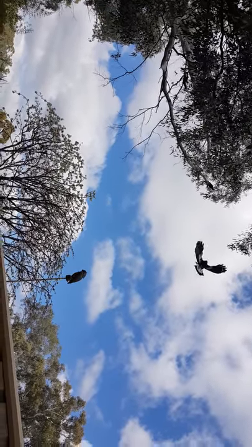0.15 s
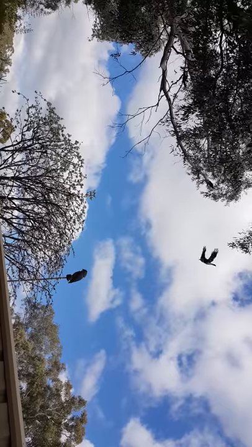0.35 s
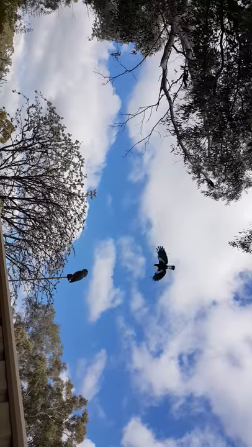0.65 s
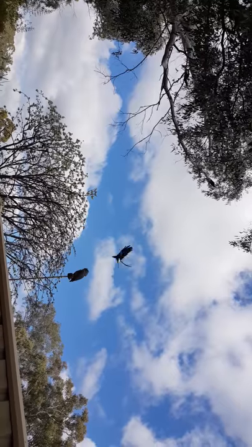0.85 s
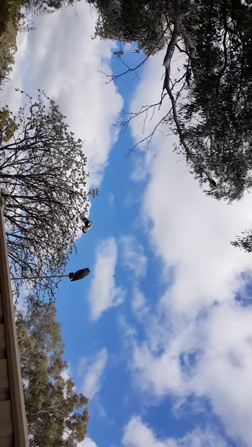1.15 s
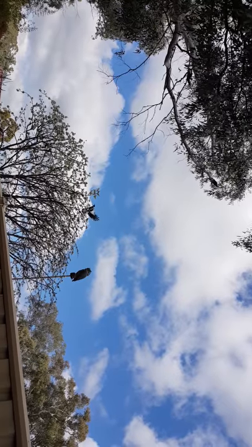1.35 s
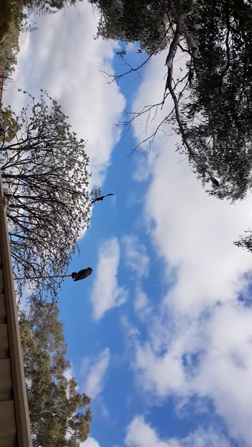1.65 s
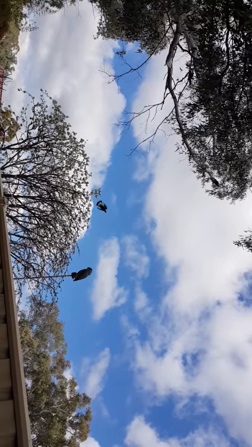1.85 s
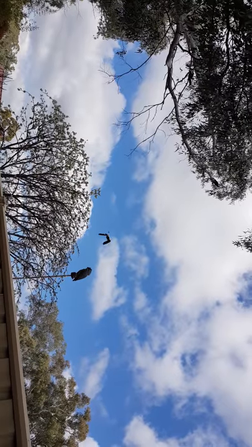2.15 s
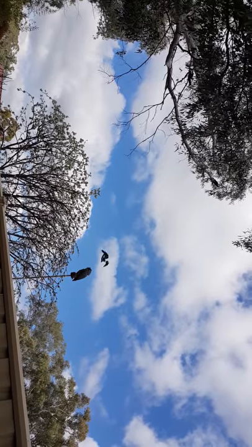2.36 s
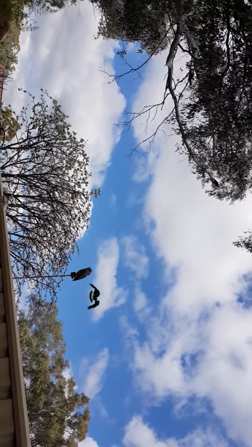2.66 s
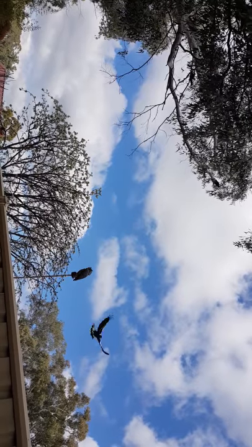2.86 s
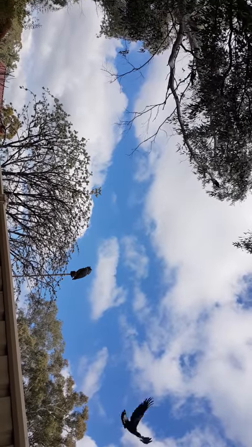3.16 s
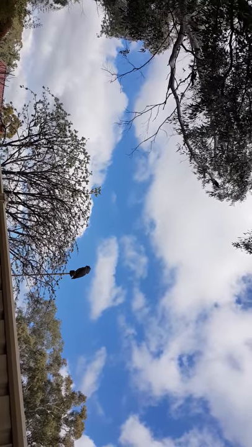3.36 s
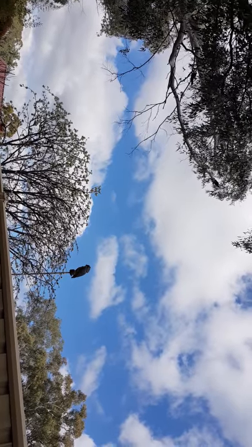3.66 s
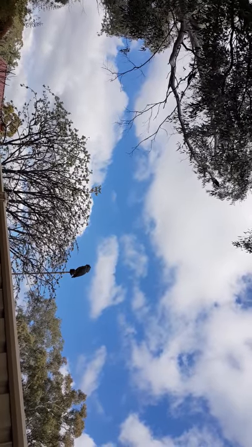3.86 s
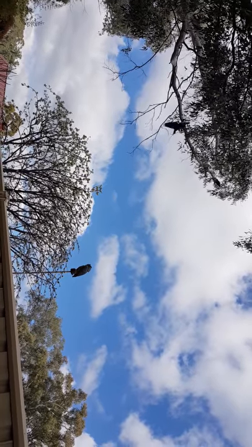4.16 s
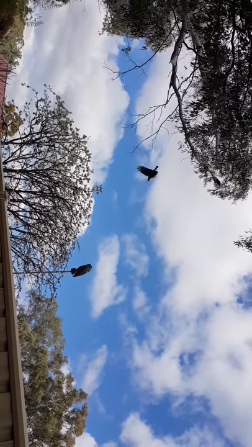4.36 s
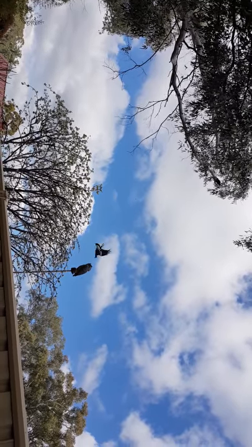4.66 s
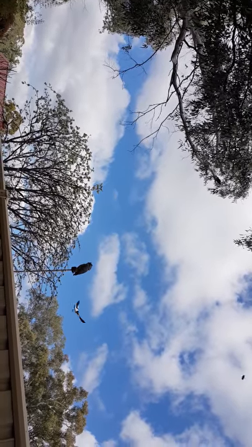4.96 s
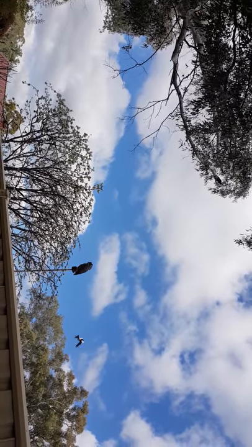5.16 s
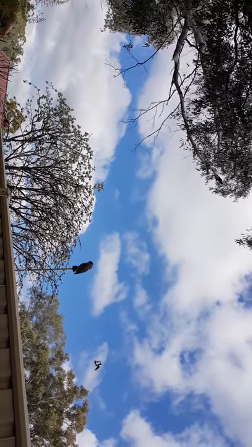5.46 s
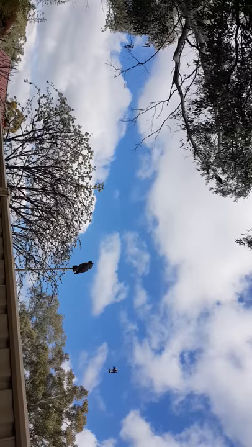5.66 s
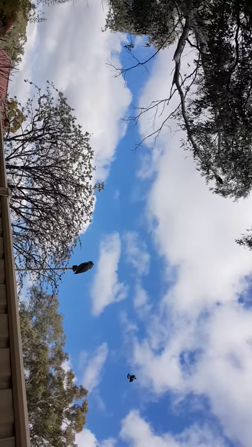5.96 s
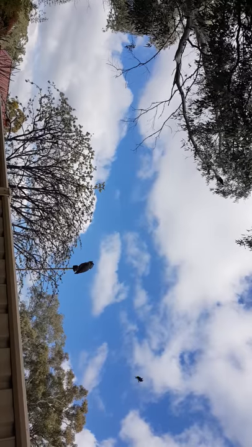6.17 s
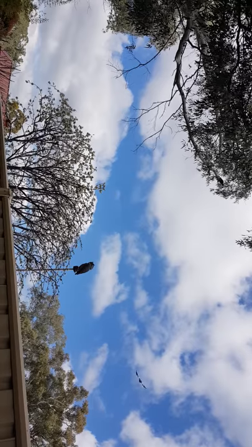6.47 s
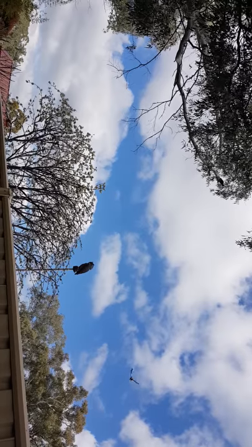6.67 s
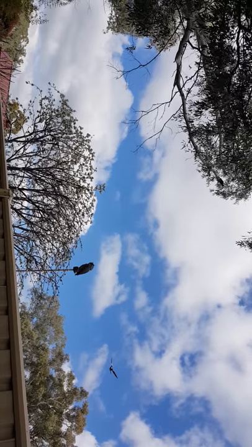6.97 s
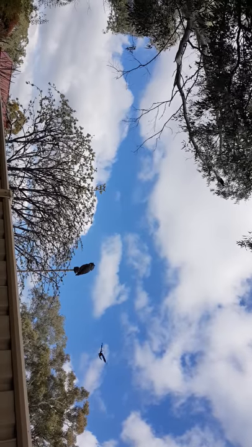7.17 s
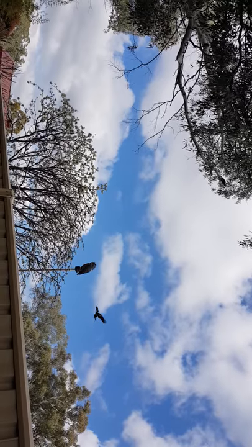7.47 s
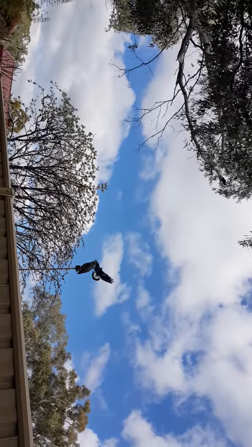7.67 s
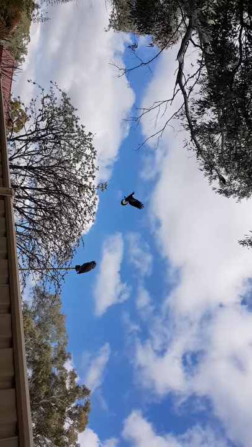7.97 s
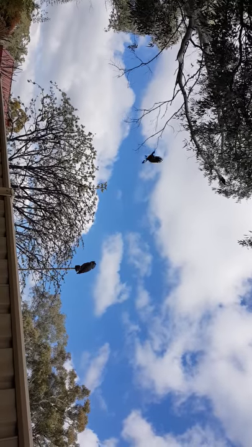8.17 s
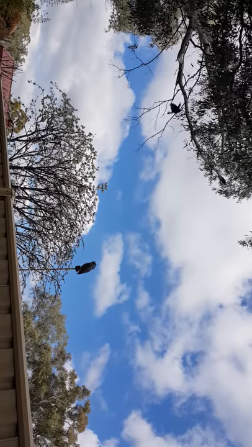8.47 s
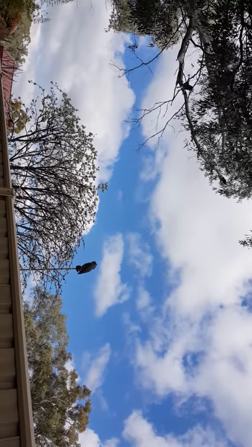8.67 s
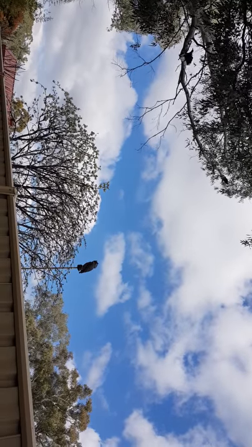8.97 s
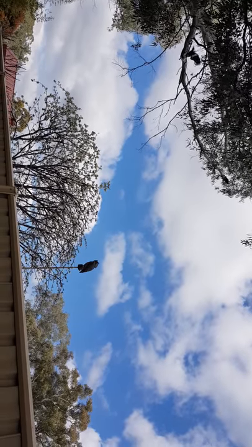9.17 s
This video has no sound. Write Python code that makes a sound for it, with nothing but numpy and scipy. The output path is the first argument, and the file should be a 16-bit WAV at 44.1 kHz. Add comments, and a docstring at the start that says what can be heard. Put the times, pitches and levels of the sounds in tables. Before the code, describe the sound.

Raspy, rattling magpie alarm squawks come in quick succession outdoors, with two loud bill clicks, soft wing puffs, a small bird's dry chips and faint wind.

```python
"""A back yard: magpies scold in runs of short, harsh alarm calls, sometimes two at once.
Each call is a tone, mostly near 1 kHz, shaken by a fast flutter of the voice box (syrinx) and coloured
by the throat; a few whistles hardly flutter. Bills snap and ring, wings push puffs of air, and a small
bird rattles dry chips far off. Walls and trees answer the magpies; behind them lie shaped noises:
wind and gusts on the microphone, the neighbourhood hush and distant traffic."""
import sys
import numpy as np
from scipy import signal
from scipy.fft import rfft, irfft, next_fast_len
from scipy.io import wavfile

SR = 44100
rng = np.random.default_rng(int(sys.argv[2]) if len(sys.argv) > 2 else 0)


def transcribe(u):
    """Save the signal u as a 16-bit wav file named by the first command-line argument.

    u: samples, shape (n,) or (channels, n), limited to [-1, 1]; the rate is SR.
    q: integer samples, one column per channel.
    """
    v = np.clip(np.atleast_2d(u).T, -1, 1)
    q = np.round(v * 32767).astype(np.int16)
    wavfile.write(sys.argv[1], SR, q)


N = 410995
T = np.arange(N) / SR   # time of every sample, s
CUTOFF_HZ = 15750   # top of the voices' harmonics and of the recorded sound


def from_db(db):
    """Turn decibels into gain."""
    return 10 ** (np.asarray(db) / 20)


def rms_one(x):
    """Scale a sound to an average strength (rms) of 1."""
    return x / np.sqrt(np.mean(x ** 2) + 1e-20)


def in_time(rows, t=T):
    """Read each column of a table as a curve at the times t."""
    s, *columns = np.transpose(rows)
    return [np.interp(t, s, column) for column in columns]


def at_hz(points, hz, axis=1):
    """Read one column of a spectrum, with pitch on a log scale as we hear it."""
    points = np.array(points)
    return np.interp(np.log(hz), np.log(points[:, 0]), points[:, axis])


def wander(rate_hz, size):
    """Smooth random drift of rms 1, weaker in its movements faster than rate_hz."""
    hz = np.arange(size // 2 + 1) * SR / size
    gain = (hz > 0) / (1 + (hz / rate_hz) ** 2)
    return rms_one(irfft(rfft(rng.standard_normal(size)) * gain, size))


def flicker(rate_hz):
    """Random drift over the whole scene, worked out at 8192 points and joined by lines."""
    points = wander(rate_hz * N / 8192, size=8192)
    return np.interp(T, np.linspace(0, T[-1], 8192), points)


def coloured(spectrum, alike):
    """Stereo noise of rms 1 with a given spectrum; alike = 1 makes both sides the same."""
    size = next_fast_len(N)
    hz = np.arange(1, size // 2 + 2) * SR / size
    fade_above = 1 / (1 + (hz / (2 * spectrum[-1][0])) ** 4)
    gain = from_db(at_hz(spectrum, hz)) * fade_above
    mid, side = irfft(rfft(rng.standard_normal((2, size))) * gain, size)[:, :N]
    alike = np.clip(alike, -1, 1)
    return rms_one(np.sqrt(1 + alike) * mid + np.sqrt(1 - alike) * side * [[1], [-1]])


def delayed(x, s):
    """Play the sound s seconds later."""
    steps = np.arange(len(x))
    return np.interp(steps - s * SR, steps, x, left=0, right=0)


def add(out, start_s, call, lag_ms=0, pan_db=0):
    """Mix in one sound; a left-side lag and a left-minus-right level place it in stereo."""
    for channel, lag_s, side_db in ((0, lag_ms / 1000, pan_db / 2), (1, 0, -pan_db / 2)):
        at = round((start_s + lag_s) * SR) + np.arange(len(call))
        inside = (at >= 0) & (at < N)
        out[channel, at[inside]] += from_db(side_db) * call[inside]


# Alarm calls, levels relative: start_s, length_s, attack_s, level_db, pitch_hz (middle),
# glide_semitones, arch_semitones, swing (flutter as a share of pitch),
# fundamental_db, edge_db (upper harmonics), bill_db (resonance), top_db (top treble),
# lag_ms (left side later), pan_db (left minus right)
SQUAWKS = [(-0.11, 0.198, 0.05, -19.8, 1105.0, -0.3, 1.1, 0.065, -1.0, -5.3, 10.0, -1.0, 0.05, 0.5),
           (0.284, 0.085, 0.035, -30, 1480, -3, 0.3, 0.1, -2, -9, 0, -5, 0.05, 0),
           (0.315, 0.132, 0.045, -22, 1200, -3.6, 0.3, 0.085, 0, -3.5, 10, -4, 0.05, 0),
           (0.712, 0.279, 0.15, -28.2, 990.0, -2.6, 0.6, 0.103, -0.0, -4.7, -4.0, -1.0, -0.06, 0.5),
           (0.826, 0.242, 0.135, -22.9, 1027.0, 2.6, 1.6, 0.055, -4.0, -7.1, 5.0, -12, 0.06, -0.5),
           (1.223, 0.211, 0.09, -24.4, 1092.0, 0.6, 1.3, 0.047, -1.0, -6.9, 12.0, -8.0, 0.03, 0.5),
           (1.239, 0.199, 0.048, -32.0, 1219.0, -3.6, 0.9, 0.114, 3.0, -2.5, 10.0, -1.0, 0.03, 1.0),
           (1.583, 0.159, 0.044, -31.9, 1664.0, -3.2, 0.6, 0.08, -5.0, -6.5, 2.0, 3.0, -0.03, -0.5),
           (1.636, 0.154, 0.084, -29.6, 1295.0, -2.1, 1.3, 0.067, 6.0, -3.3, -0.0, 2.0, 0.0, 0.0),
           (1.992, 0.192, 0.05, -22.0, 1073.0, -0.1, 1.7, 0.054, -0.0, -8.5, 2.0, 3.0, 0.06, 0.5),
           (2.75, 0.182, 0.042, -17.0, 1073.0, 0.5, 1.4, 0.056, -5.0, -7.9, 7.0, 7.0, 0.14, -1.0),
           (3.077, 0.299, 0.176, -26.8, 968.0, -1.9, -0.2, 0.104, -2.0, -5.9, 1.0, -11.0, -0.05, 1.0),
           (3.157, 0.191, 0.085, -17.2, 1120.0, -0.2, 1.0, 0.057, 0.0, -7.5, 6.0, 8.0, 0.27, -3.5),
           (3.507, 0.257, 0.126, -24.9, 983.0, -0.6, 0.1, 0.062, -3.0, -3.2, 8.0, -2.0, -0.17, 0.5),
           (4.336, 0.152, 0.049, -23.7, 1044.0, -1.3, 0.5, 0.058, -1.0, -11.5, 5.0, -4.0, 0.22, 0.0),
           (4.616, 0.235, 0.091, -23.5, 970.0, -0.2, 0.8, 0.059, -4.0, -8.3, 6.0, -12.0, 0.06, 0.5),
           (5.003, 0.261, 0.152, -22.7, 1026.0, 0.2, 1.4, 0.06, 1.0, -9.1, 2.0, -8.0, 0.08, 0.0),
           (5.296, 0.306, 0.114, -29.6, 954.0, -2.8, 1.0, 0.089, 0.0, -3.2, 3.0, 4.0, -0.07, 1.0),
           (5.513, 0.212, 0.022, -30.6, 970.0, -1.3, -0.2, 0.042, -4.0, -9.9, 10.0, -16.0, 0.19, 0.0),
           (5.933, 0.279, 0.109, -30.0, 1008.0, -1.3, 0.1, 0.03, -0.0, -11, -4, 3.0, 0.22, -2.5),
           (6.45, 0.26, 0.06, -25.7, 992.0, 0.8, 2.0, 0.055, -2.0, -8.5, -2.0, -1.0, 0.08, -2.5),
           (6.825, 0.31, 0.104, -31.6, 957.0, -3.7, 1.1, 0.086, -1.0, -3.3, 1.0, 1.0, -0.07, 1.5),
           (7.825, 0.233, 0.091, -26.9, 947.0, -0.3, 1.0, 0.065, -1.0, -2.3, 5.0, -1.0, -0.03, 1.0),
           (8.022, 0.271, 0.1, -26.3, 935.0, -3.1, 0.1, 0.116, -1.0, -1.8, -2.0, 2.0, -0.1, 2.5),
           (8.075, 0.256, 0.09, -25.8, 999.0, 0.1, 1.9, 0.042, -4.0, -12.1, 1.0, -3.0, 0.07, -4.0),
           (8.306, 0.232, 0.095, -27.0, 918.0, -0.9, 1.0, 0.062, -3.0, -1.2, 8.0, -4.0, -0.15, 1.0),
           (8.545, 0.205, 0.079, -32.7, 809.0, -1.1, 0.5, 0.08, -4.0, 1.1, -8.0, -7.0, -0.22, 3.0)]
ONSET_DB, RELEASE_DB, RELEASE_S = 19, 27, .044   # effort rises from this far down and drops at the end
SWELL_DB = 3   # growth along a call
SAG_SEMITONES_PER_DB = .025   # pitch sags as effort falls
RASP_PER_SWING = .2   # the wider the flutter, the rougher the tone


def alarm_calls(gain_db=-.3):
    """Each call swells, holds and drops; its pitch glides, arches and sags with the effort."""
    out = np.zeros((2, N))
    age = T[:16384]
    for (start, length, attack, level_db, pitch, glide, arch, swing,
         fundamental_db, edge_db, bill_db, top_db, lag_ms, pan_db) in SQUAWKS:
        onset_db = -ONSET_DB * np.clip(1 - age / attack, 0, 1) ** 2
        release_db = -RELEASE_DB * np.clip(1 + (age - length) / RELEASE_S, 0, 2) ** 2
        effort_db = onset_db + release_db
        along = np.minimum(age / length, 1) - .5   # -0.5 at the start, 0.5 at the end
        sag = SAG_SEMITONES_PER_DB * np.maximum(effort_db, -RELEASE_DB)
        semitones = glide * along - arch * (2 * along) ** 2 + sag
        hz = pitch * 2 ** (semitones / 12)
        loudness_db = level_db + effort_db + SWELL_DB * along
        call = squawk(age, hz, loudness_db, swing, RASP_PER_SWING * swing,
                      fundamental_db, edge_db, bill_db, top_db)
        add(out, start, call, lag_ms, pan_db)
    return from_db(gain_db) * out


# Fluted notes, levels relative: start_s, length_s, level_db, pitch_hz (middle), glide_semitones,
# fundamental_db, edge_db (upper harmonics), bill_db (resonance)
WHISTLES = [ (1.68, .14, -33, 1222, -1, 16, 0, 22), (1.81, .115, -41, 1260, 0, 20, -14, 0),
            (1.922, .068, -39, 897, .2, 15, -2, 11), (1.985, .135, -40, 1430, -1.1, 30, -5, 0)]
WHISTLE_EDGE_DB = 12   # each note is this far down at its start and end


def whistles(swing=.003, rasp=.004, top_db=3, pan_db=2):
    """The same voice box with hardly any flutter: short, fluted notes."""
    out = np.zeros((2, N))
    age = T[:8192]
    for start, length, level_db, pitch, glide, fundamental_db, edge_db, bill_db in WHISTLES:
        along = np.minimum(age / length - .5, 1)
        hz = pitch * 2 ** (glide * along / 12)
        effort_db = -WHISTLE_EDGE_DB * (2 * along) ** 4
        note = squawk(age, hz, level_db + effort_db, swing, rasp,
                      fundamental_db, edge_db, bill_db, top_db, throb=.05)
        add(out, start, note, 0, pan_db)
    return out


# How throat and open bill colour the voice and its hiss: pitch_hz, level_db (relative)
THROAT = [(600, -10), (950, -10.8), (1250, -9), (1600, 2.5), (2100, 4), (2550, -7.5), (3300, -11.5),
          (3650, -8.5), (4450, -6.5), (5100, -12), (6800, -16.5), (8300, -32), (11000, -22.5), (16000, -40)]
TREBLE_FOLLOWS = .3   # extra dB of top treble lost for each dB of level lost
UNSTEADY_DB = 1.1   # the strength of a call wavers by this much (rms)
FLUTTER_HZ, FLUTTER_FOLLOWS = 125, .4   # flutter of a 1 kHz tone; it rises as this power of the pitch


def squawk(t, pitch, level_db, swing, rasp, fundamental_db, edge_db, bill_db, top_db,
           throb=0.19, skew=0.16, fade_s=0.0024, bill_hz=4550, bill_width_hz=350):
    """A tone whose pitch and strength flutter, so every harmonic splits into a cluster of lines."""
    size = len(t)
    scratch, hiss = .2, .2   # roughness of the high harmonics, share of breath noise
    dull_db = TREBLE_FOLLOWS * (level_db - level_db.max())
    flutter_hz = FLUTTER_HZ * (pitch / 1000) ** FLUTTER_FOLLOWS
    beat = 2 * np.pi * np.cumsum(flutter_hz * (1 + .025 * wander(30, size))) / SR
    flutter = np.sin(beat) + skew * np.cos(2 * beat)   # round tops, sharp dips
    hz = pitch * (1 + swing * flutter + rasp * wander(220, size))
    phase = 2 * np.pi * np.cumsum(hz) / SR

    k = np.arange(1, 19)[:, None]   # harmonic numbers
    # the gape sets a resonance; the top treble is beamed, so each call has its own amount
    gape_db = bill_db * np.exp(-((k * hz - bill_hz) / bill_width_hz) ** 2)
    beam_db = (top_db + dull_db) * np.clip((k * hz - 6000) / 5000, 0, 1)
    gain = from_db(at_hz(THROAT, k * hz) + gape_db + beam_db) * (k * hz < CUTOFF_HZ)
    partials = gain * np.sin(k * phase + rng.uniform(0, 2 * np.pi, k.shape))

    body = rms_one(from_db(fundamental_db) * partials[0] + partials[1])
    # turbulence tears only the fifth harmonic and those above
    torn = partials[4:].sum(0) * (1 + scratch * wander(280, size))
    edge = rms_one(partials[2:4].sum(0) + torn)
    edge = edge + hiss * from_db(dull_db) * rush(size, top_db)
    gate = np.clip(np.minimum(t - t[0], t[-1] - t) / fade_s, 0, 1)
    strength = from_db(level_db + UNSTEADY_DB * wander(35, size)) * (1 + throb * flutter)
    return gate * strength * (body + from_db(edge_db) * edge)


def rush(size, top_db):
    """Air hissing through the upper resonances of the throat."""
    hz = np.arange(1, size // 2 + 2) * SR / size
    beam_db = top_db * np.clip((hz - 6000) / 5000, 0, 1)
    low_cut = 1 / (1 + (5000 / hz) ** 6)
    gain = from_db(at_hz(THROAT, hz) + beam_db) * low_cut
    return rms_one(irfft(rfft(rng.standard_normal(size)) * gain, size))


# Bill claps: start_s, strike_db (strength of the click that sets the bill ringing)
CLAPS = [(2.580, -25.5), (7.766, -23), (8.815, -46)]
# Tones of the ringing bill: pitch_hz, level_db (relative), t60_s (time to fall by 60 dB)
BILL = [(1290, -4, 0.0062), (2130, -5.5, .012), (3470, -5, 0.012), (4170, -6, 0.0096), (6500, -2, 0.0069),
        (11600, -11.5, 0.0021)]


def bill_claps():
    """The two halves of the bill snap shut and ring for a moment."""
    clicks = np.full(N, 1e-18)   # not quite zero, which keeps the filters quick
    out = 0
    for s, strike_db in CLAPS:
        clicks[round(s * SR)] = from_db(strike_db)
    for k, (hz, level_db, t60) in enumerate(BILL):
        shrink = from_db(-60 / (t60 * SR))   # loss per sample
        turn = 2 * np.pi * hz / SR
        ring = signal.lfilter([np.sin(turn)], [1, -2 * shrink * np.cos(turn), shrink ** 2], clicks)
        out = out + (-1) ** k * from_db(level_db) * ring
    return np.array([delayed(out, .00007), out])   # the left side comes a touch later


# Wing beats: middle_s, level_db
WINGBEATS = [(.21, -42), (.3, -49), (.51, -47.5), (.6, -56), (1.93, -63), (2.33, -55)]
# Colour of the wing noise: pitch_hz, level_db (per Hz, relative)
WING = [(60, -40), (150, 3), (300, -4.5), (500, -9), (1500, -32)]


def wings(length_s=0.026):
    """Each downstroke pushes a soft puff of air: low noise under a bell-shaped swell."""
    puffs = sum(from_db(level_db) * np.exp(-((T - s) / length_s) ** 2 / 2)
                for s, level_db in WINGBEATS)
    return puffs * coloured(WING, alike=0.83)


# Near reflections from eave, ground and fences: delay_s (average), level_db
ECHOES = [(.0023, -16.5), (.009, -10.5), (.021, -8.5), (.047, -36)]
# Tail among trees and houses: pitch_hz, level_db, t60_s (time to fall by 60 dB)
TAIL = [(500, -12.5, 2.3), (1010, -17, 0.37), (1600, -17, 1.0), (2110, -14.6, 1.17), (2800, -12.5, 0.54),
        (4400, -15.5, 0.76), (7160, -14, 0.63), (13900, -11, 0.17)]


def backyard(x, length_s=1.3, build_s=0.027):
    """A few near reflections and a thin scattered tail, each band dying at its own pace."""
    t = T[:int(length_s * SR)]
    response = np.zeros((2, len(t)))
    edges = np.geomspace(350, 16000, 17)   # band borders, Hz
    for low, high in zip(edges, edges[1:]):
        centre = np.sqrt(low * high)
        decay = from_db(-60 * t / at_hz(TAIL, centre, axis=2)) * (1 - np.exp(-t / build_s))
        scatter = rng.standard_normal(response.shape) * decay / np.sqrt(np.sum(decay ** 2))
        band = signal.butter(2, [low, high], "band", fs=SR, output="sos")
        response += from_db(at_hz(TAIL, centre)) * signal.sosfilt(band, scatter)
    for delay_s, level_db in ECHOES:
        at = (delay_s * SR * rng.uniform(.93, 1.07, 2)).astype(int)   # a little different on each side
        response[[0, 1], at] += from_db(level_db)
    return x + signal.fftconvolve(x, response, axes=1)[:, :N]


# Chip runs of a small bird: start_s, length_s, first_db, last_db (chip levels, relative)
RATTLES = [(5.968, .39, -35, -37), (6.744, .05, -46, -46), (7.144, .22, -34, -50), (9.05, .11, -48, -45)]
# Level of its scattered chatter in the foliage: time_s, level_db (relative)
CHATTER = [(0, -69.5), (4.2, -56.5), (5.6, -52.5), (6.4, -47.5), (7.2, -50), (7.42, -57.5), (9.15, -58),
           (9.32, -66)]
# Colour of that chatter: pitch_hz, level_db (per Hz, relative)
CHATTER_BAND = [(2200, -14), (3000, -8), (3900, -9), (4600, -22), (6000, -28)]
CHIP_GAP_S = .0352


def rattle(chip_db=-2, scatter_db=-3, flicker_db=3.5):
    """A small bird's even runs of dry falling chips, over their smear in the foliage."""
    chip_s, chip_hz, unsteady_s = .0017, 3800, .001
    fall_hz, rasp_hz = 150, 300   # pitch drop per chip_s, random pitch shake
    smear_db = in_time(CHATTER)[0] + scatter_db + flicker_db * flicker(25)
    smear = from_db(smear_db) * coloured(CHATTER_BAND, alike=0.24)
    chips = np.zeros((2, N))
    age = T[:512] - 2 * chip_s   # zero at the loudest moment
    for start, length, first_db, last_db in RATTLES:
        for s in np.arange(0, length, CHIP_GAP_S):
            hz = chip_hz - fall_hz * age / chip_s + rasp_hz * wander(900, len(age))
            level_db = chip_db + first_db + (last_db - first_db) * s / length
            chip_start = start + s + rng.normal(0, unsteady_s)
            tone = np.sin(2 * np.pi * np.cumsum(hz) / SR)
            add(chips, chip_start, from_db(level_db) * np.exp(-(age / chip_s) ** 2) * tone)
    return chips + smear


# Breeze on the microphone: time_s, level_db (relative)
BREEZE = [(0, -62), (.5, -61), (.8, -80), (1.45, -62), (3.9, -62), (4.1, -82), (4.4, -69), (4.7, -50),
          (5.7, -52), (6.05, -56), (7.5, -63), (9.32, -65)]
# Gusts added to it: middle_s, half_length_s, level_db (relative)
GUSTS = [(.42, .06, -57), (1.95, .02, -47), (4.9, .03, -38), (5.33, .035, -46), (5.81, .06, -43)]
# Colours of wind rumble, neighbourhood hush and traffic: pitch_hz, level_db (per Hz, relative)
RUMBLE = [(13, -44), (22, -15.5), (43, 2.5), (81, 2), (177, -19.5), (252, -17), (400, -32.5), (520, -62),
          (880, -120)]
YARD = [(60, -6), (150, -4.5), (250, 0.5), (380, 2.5), (500, 0), (1000, 2), (2000, -10), (4000, -5),
        (6000, -28.5), (9000, -31), (15000, -30)]
DRONE_BAND = [(45, -19), (70, 1.5), (100, -15), (125, -14), (142, -6), (175, -24), (300, -20.5)]
# Levels of the hush and of the distant traffic: time_s, level_db
HUSH = [(0, -49), (.7, -54.5), (1.2, -52.5), (2.2, -53.5), (3.6, -53.5), (4.15, -61), (4.6, -54),
        (6, -57.5), (7, -60), (7.7, -56), (8.5, -56.5), (9.32, -57)]
DRONE = [(0, -61), (.8, -83), (1.3, -56.5), (2.2, -60.5), (3.7, -64.5), (4.1, -77), (6.3, -64), (7.6, -59),
         (9.32, -60)]


def open_air(rumble_db=-2, lumpy_db=2, wind_side_db=8):
    """Lumpy low wind noise, mostly on the left port, plus the neighbourhood hush and its traffic."""
    gusts = sum(from_db(level_db) * np.exp(-((T - s) / length_s) ** 2 / 2)
                for s, length_s, level_db in GUSTS)
    strength = from_db(in_time(BREEZE)[0]) + gusts
    lumps = from_db(rumble_db + lumpy_db * flicker(9.2))
    wind = strength * lumps * coloured(RUMBLE, alike=0.7)
    hush = from_db(in_time(HUSH)[0]) * coloured(YARD, alike=0.62)
    drone = from_db(in_time(DRONE)[0]) * coloured(DRONE_BAND, alike=1.0)
    return wind * from_db([[wind_side_db / 2], [-wind_side_db]]) + hush + drone


def scene():
    """The birds in their yard, over the open air; the claps are close by and stir few echoes."""
    birds = alarm_calls() + whistles()
    claps = bill_claps()
    echoing = backyard(birds + claps / 2)   # only half of each clap reaches the yard
    return echoing + claps / 2 + wings() + open_air() + rattle()


PORT_TREBLE_HZ, PORT_TREBLE_DB = 7000, 3   # the right port hears this much more of the top treble


def record(dry):
    """The right microphone port is a little brighter than the left; the top is cut steeply."""
    high_pass = signal.butter(2, PORT_TREBLE_HZ, "high", fs=SR, output="sos")
    treble = signal.sosfiltfilt(high_pass, dry)
    heard = dry + treble * (from_db([[-PORT_TREBLE_DB / 2], [PORT_TREBLE_DB / 2]]) - 1)
    top_cut = signal.ellip(10, .1, 60, CUTOFF_HZ, fs=SR, output="sos")
    return signal.sosfiltfilt(top_cut, heard)


dry = scene()
out = record(dry)
transcribe(out)
```